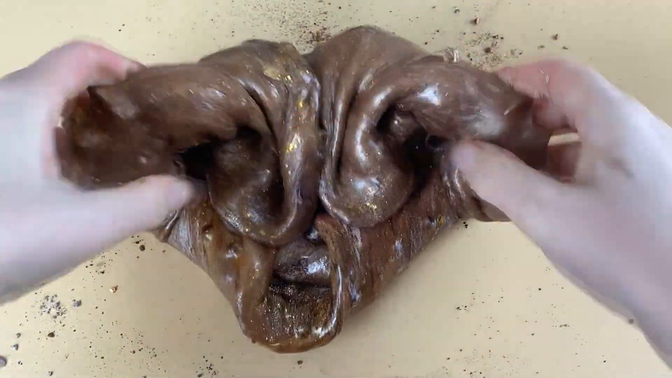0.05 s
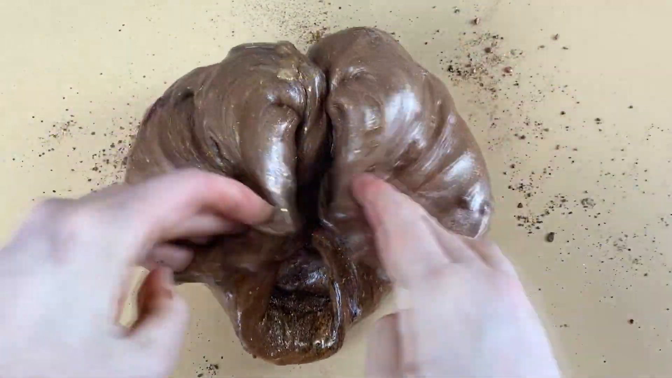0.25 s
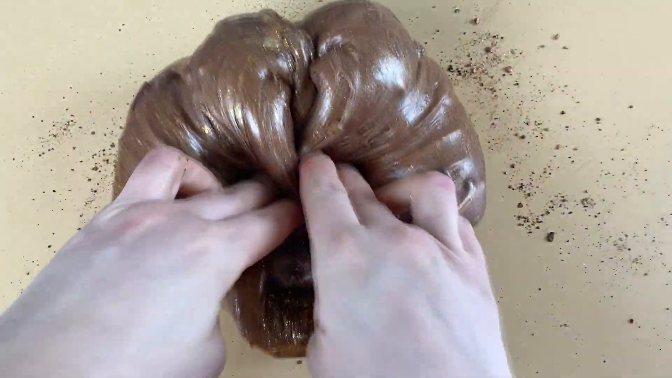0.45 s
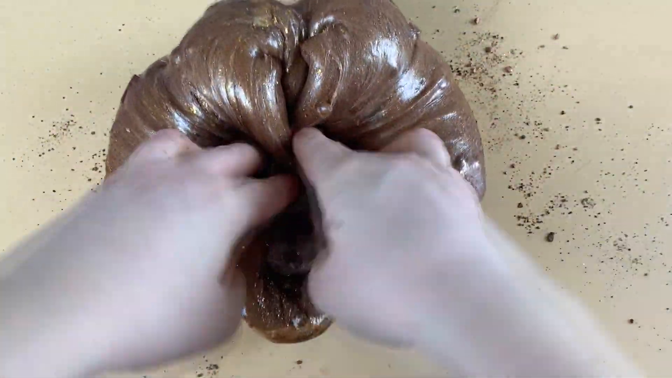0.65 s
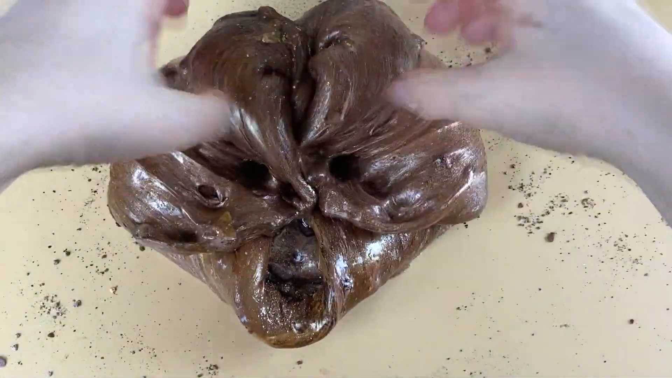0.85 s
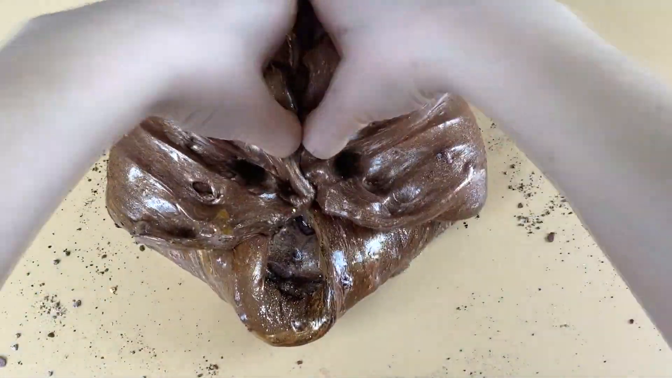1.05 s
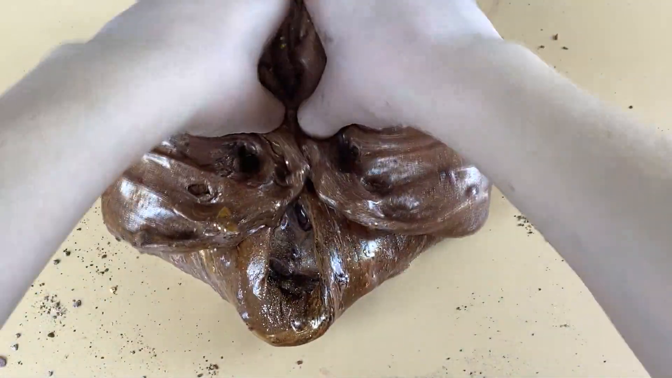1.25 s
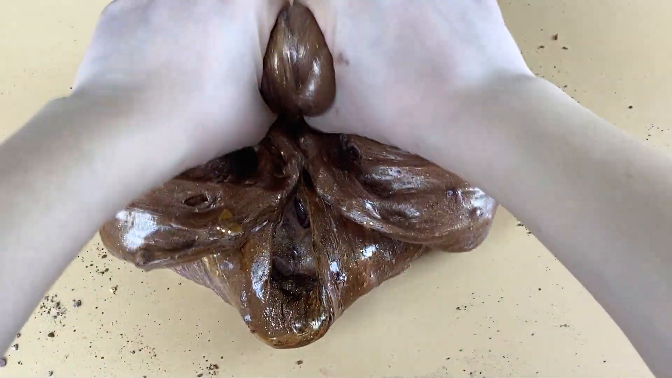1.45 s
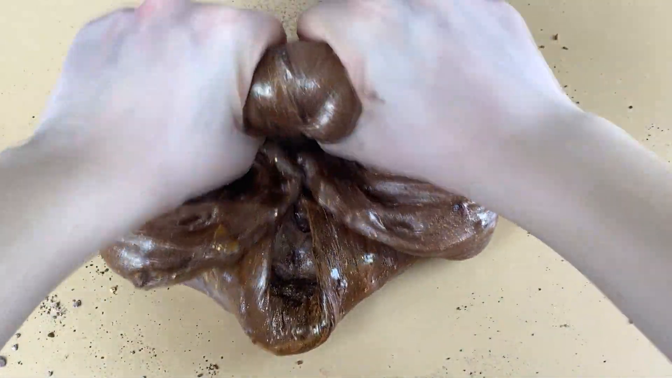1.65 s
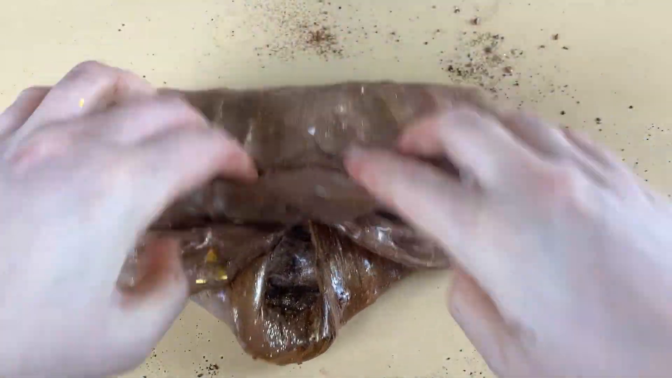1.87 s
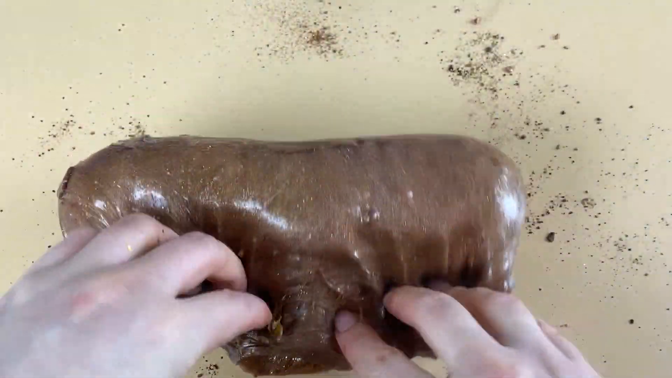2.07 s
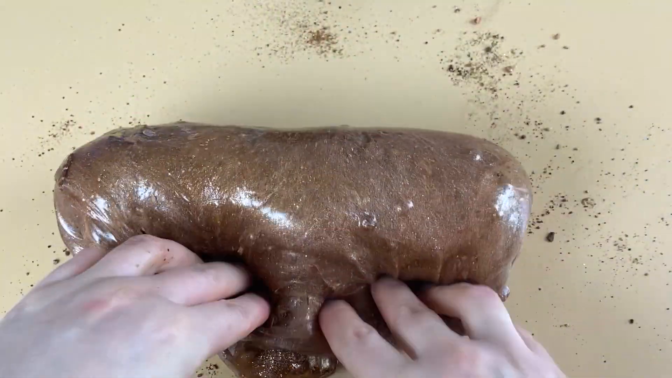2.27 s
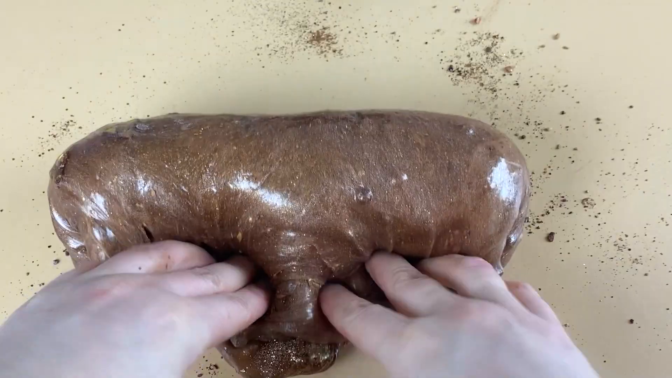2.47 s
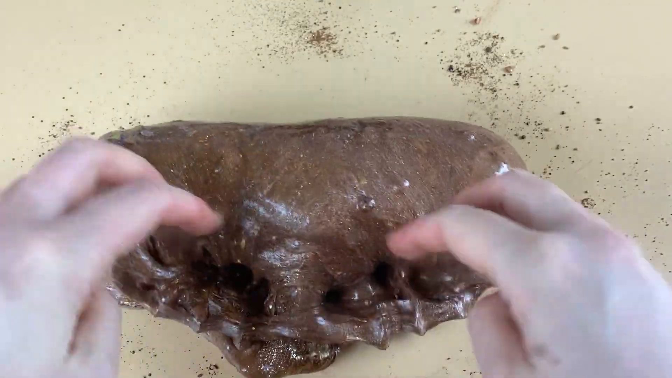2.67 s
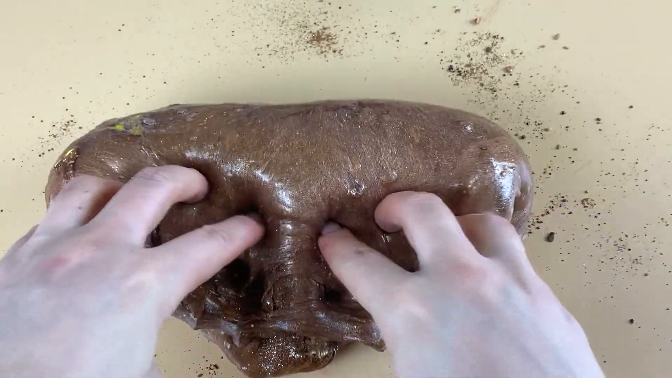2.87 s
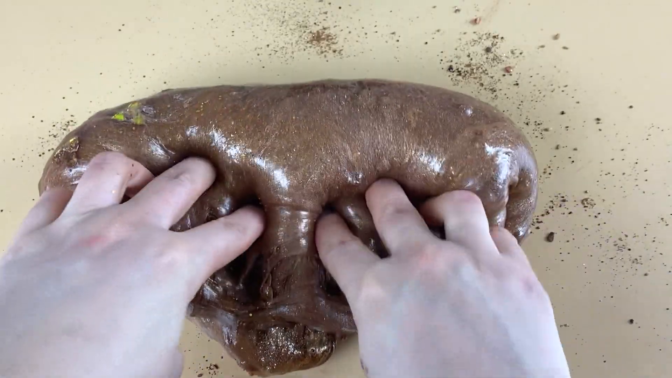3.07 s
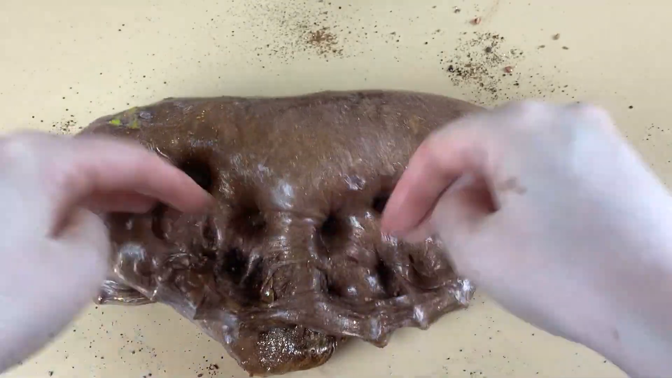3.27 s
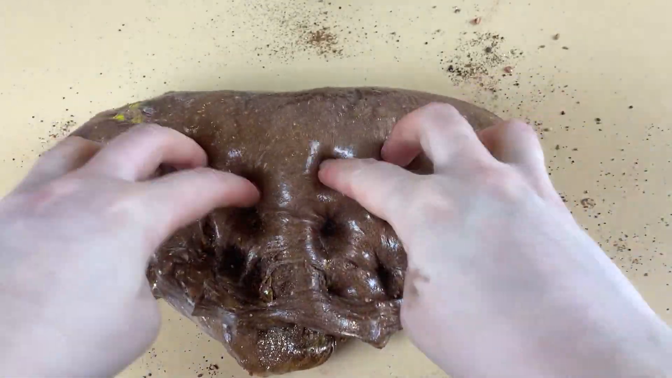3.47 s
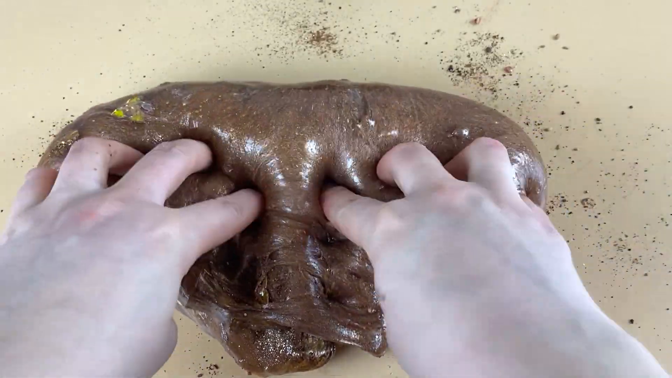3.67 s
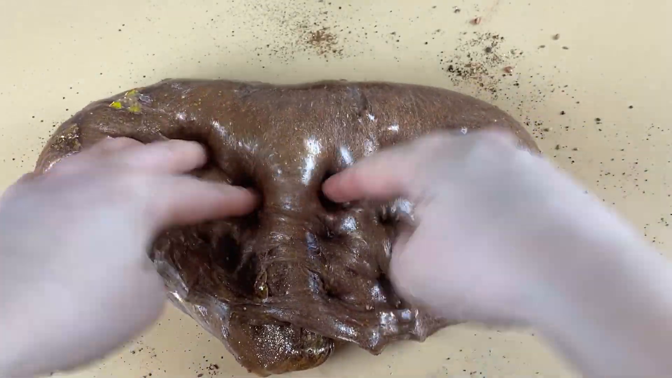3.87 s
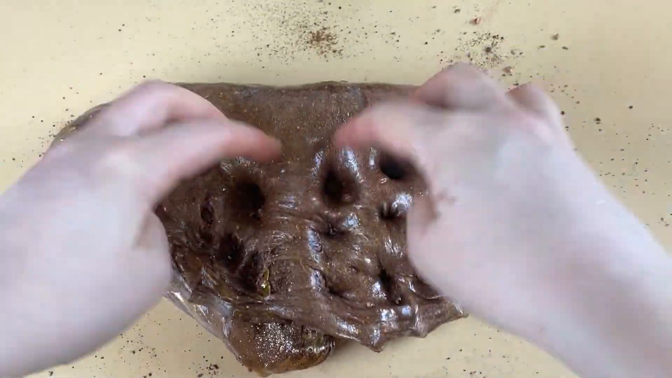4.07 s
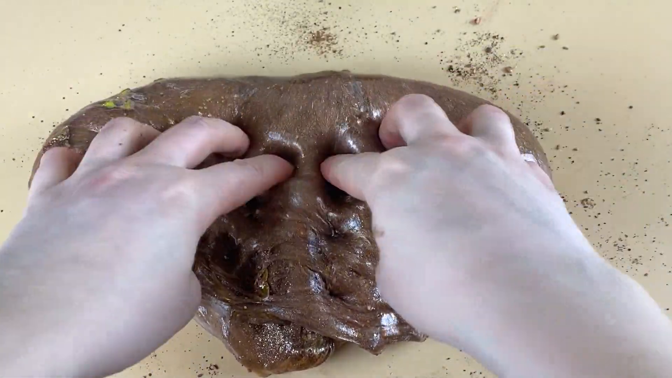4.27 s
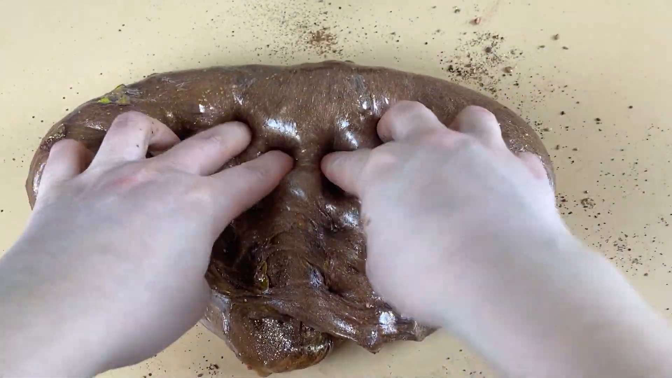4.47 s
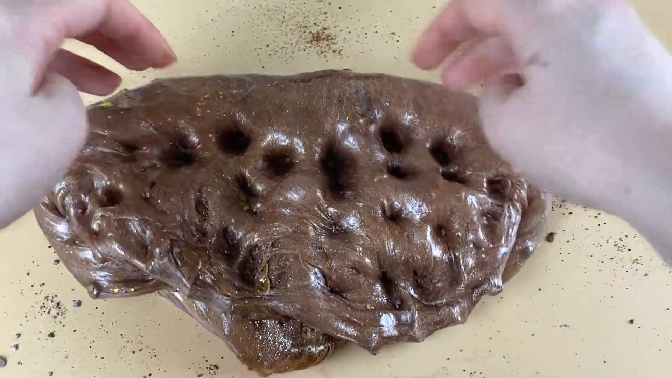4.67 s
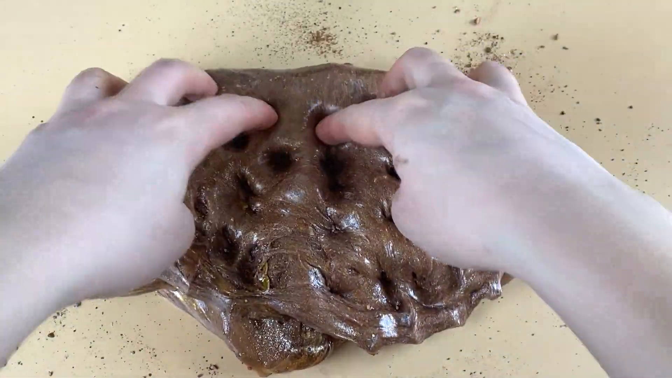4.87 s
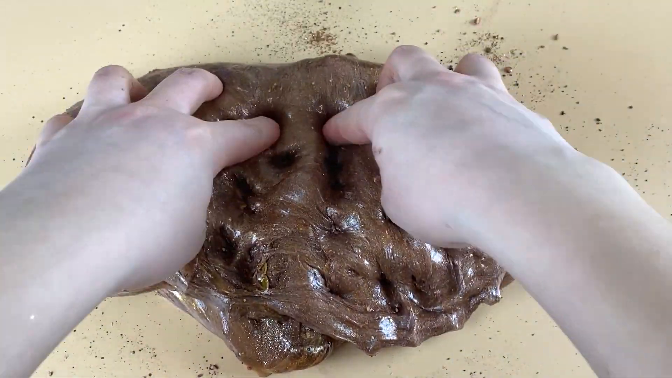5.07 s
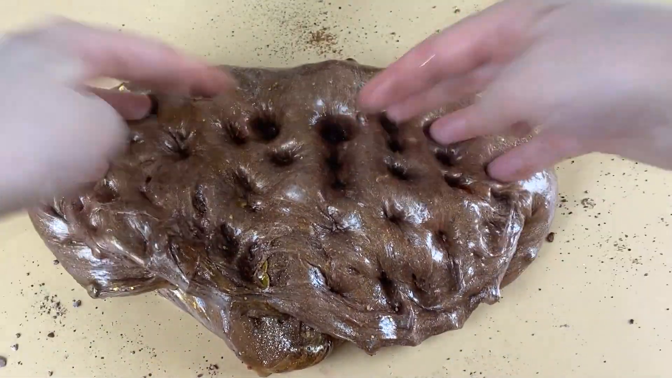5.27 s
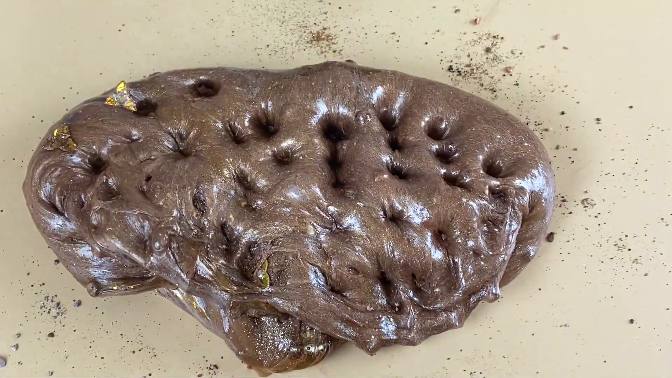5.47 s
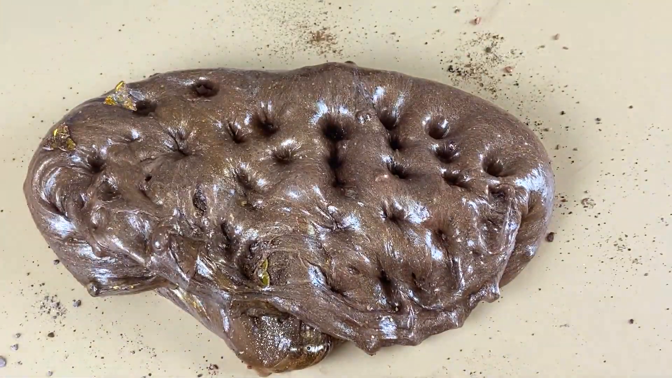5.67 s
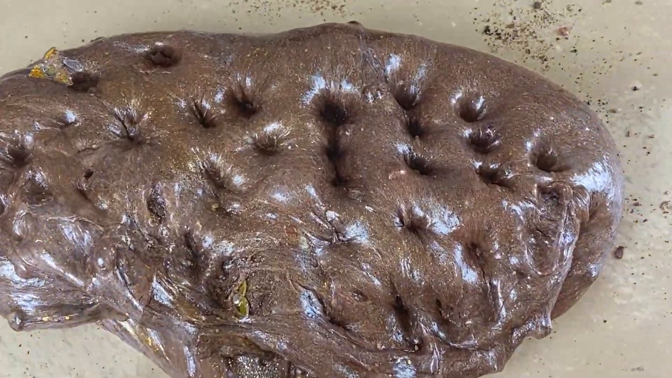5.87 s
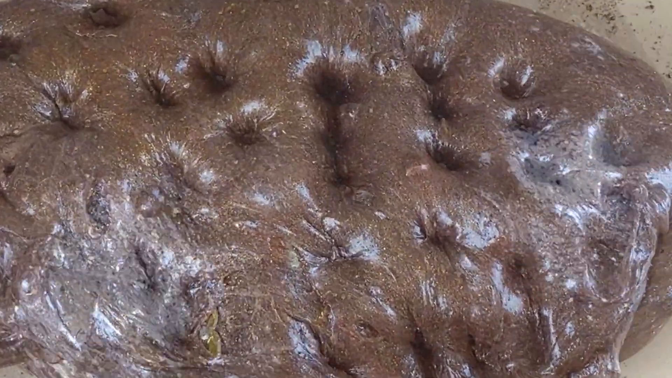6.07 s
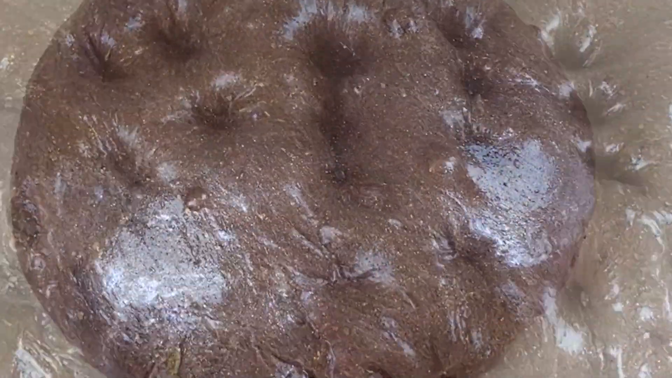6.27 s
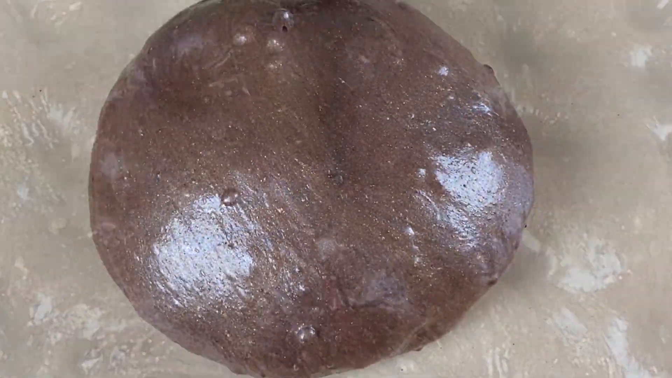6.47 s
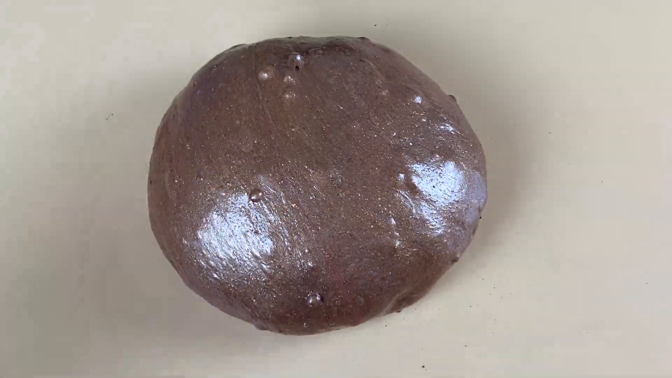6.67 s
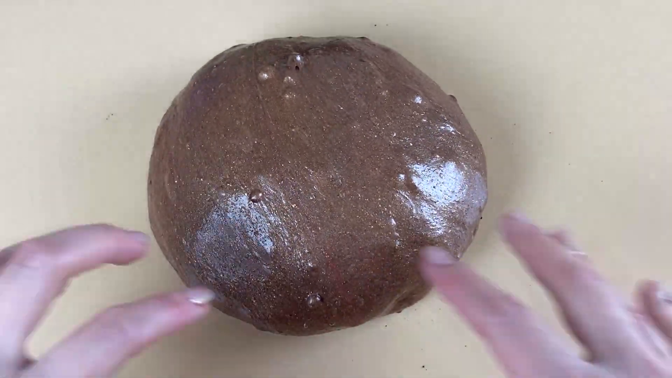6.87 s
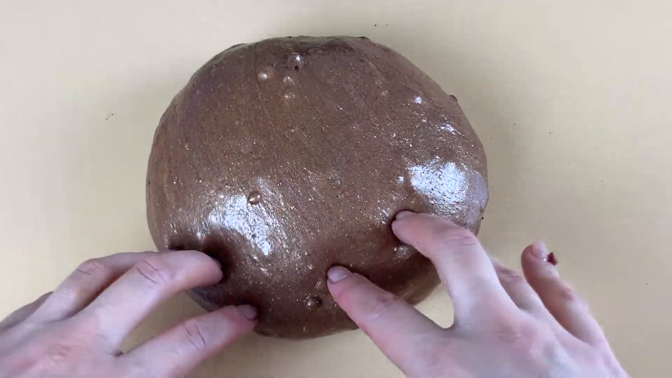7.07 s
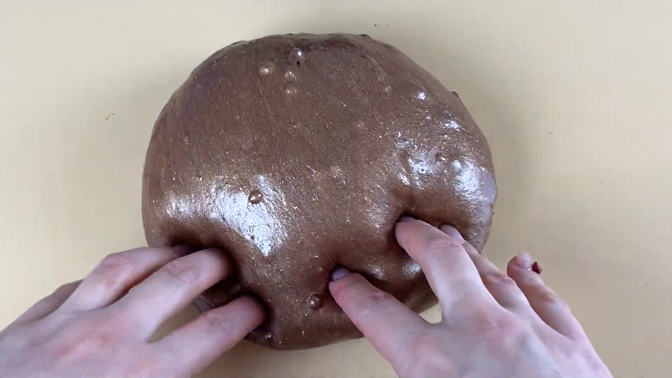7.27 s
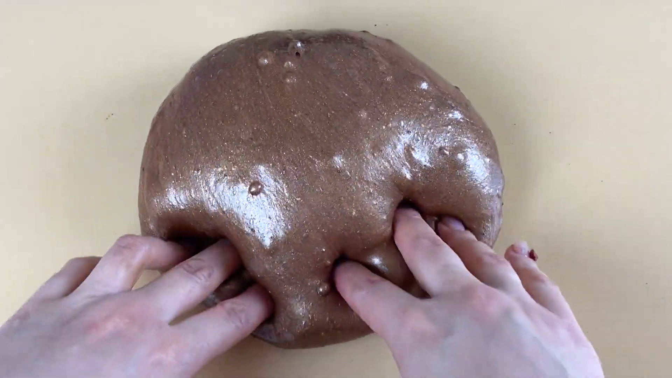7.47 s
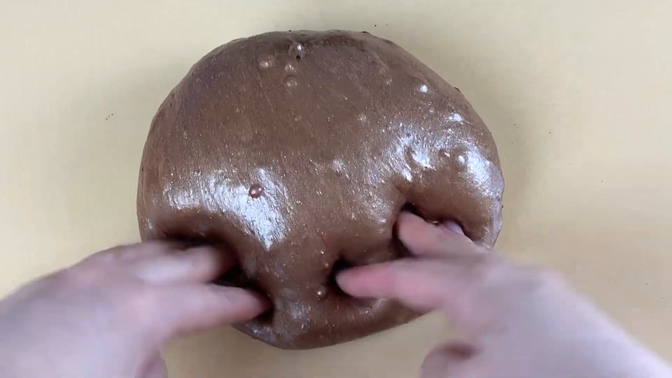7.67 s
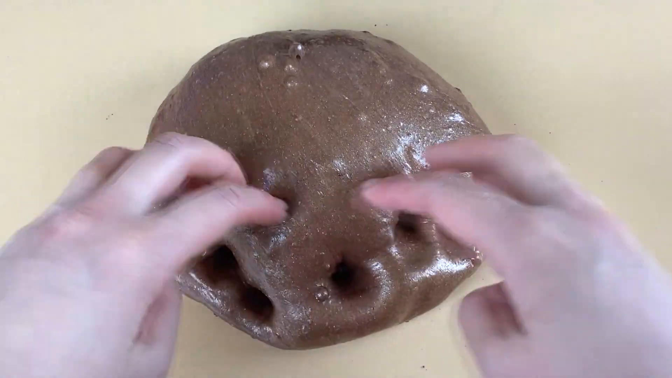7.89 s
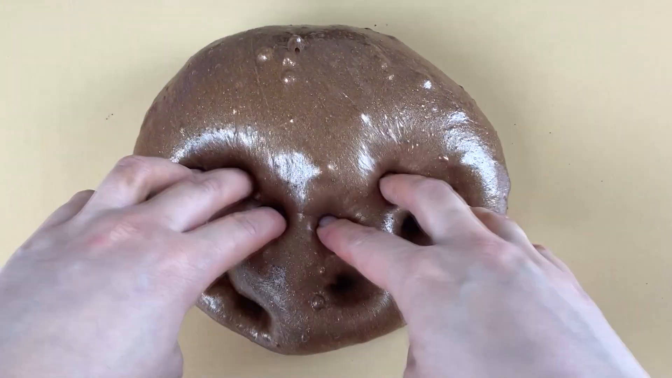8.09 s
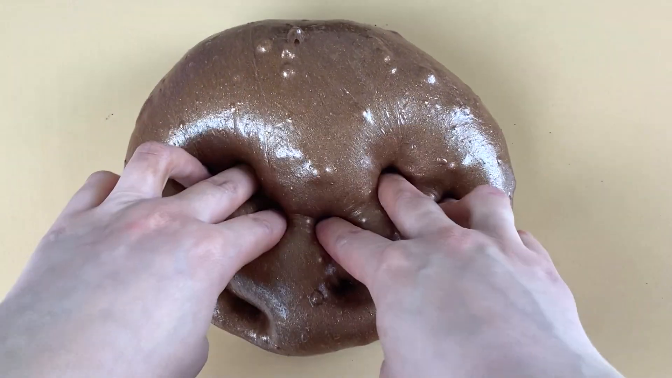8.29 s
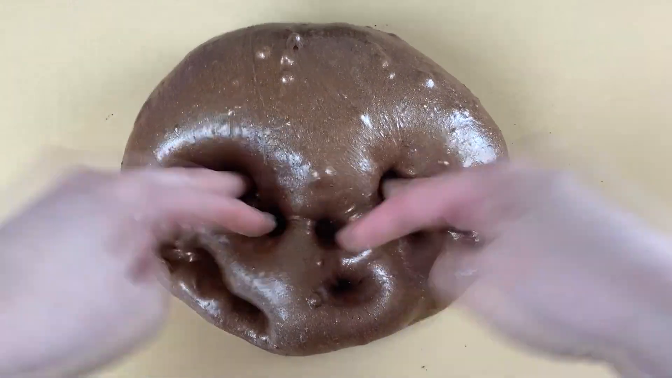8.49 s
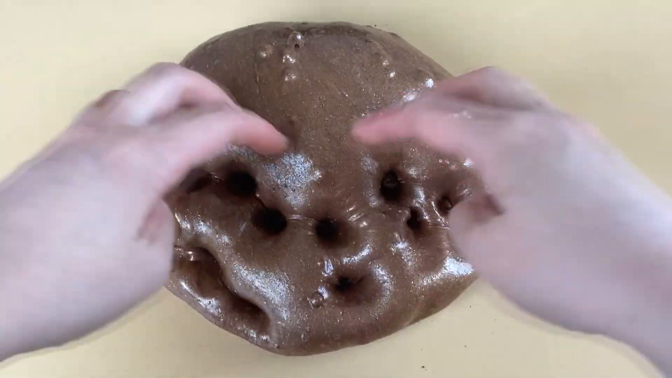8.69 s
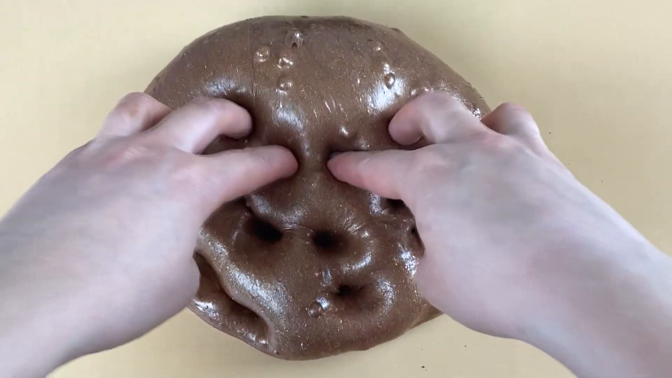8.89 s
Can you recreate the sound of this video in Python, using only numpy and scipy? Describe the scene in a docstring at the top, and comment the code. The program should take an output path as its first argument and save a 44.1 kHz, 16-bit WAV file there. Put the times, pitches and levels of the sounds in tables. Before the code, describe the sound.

Two hands work a sticky, glossy slime at a table, heard very close. It begins with squelching and crackling, thickens into a sharp, loud run of snapping air pockets with dull low thuds, then thins to rhythmic presses and sucking finger releases with hollow pops. After a near-silent gap with only room hush, a few last pokes and pops.

```python
"""Wet slime folded, squeezed and poked by two hands at a table, close to a stereo microphone in a small room.
First fingers tear loose with a wet rush and a squirt of air, and sticky skin crackles through a fold.
A second fold is squeezed from about 1 s to 2 s: air pockets snap brightly, bubbles ring and air hisses out.
Then pokes: fingers pull out in a burst of ruptures, their holes pop open; near 5.4 s a faint airy swish.
After a quiet spell, fingers sink in again from 7.2 s, with two last groups of pulls and pops."""
import sys
import numpy as np
from scipy import signal
from scipy.fft import rfft, irfft
from scipy.io import wavfile
from scipy.ndimage import uniform_filter1d

SR = 44100
rng = np.random.default_rng(int(sys.argv[2]) if len(sys.argv) > 2 else 0)


def wrap_up_sound(samples):
    """Save the sound to the file named by the first command line argument, as 16-bit audio."""
    columns = np.atleast_2d(samples).T
    # keep every value between -1 and 1, then stretch to whole-number steps
    tamed = np.clip(columns, -1, 1)
    steps = np.round(tamed * 32767).astype(np.int16)
    wavfile.write(sys.argv[1], SR, steps)


N = 393813
TIME = np.arange(N) / SR  # s

# room tone: hz, level_db (per Hz, relative)
HUSH = [(18, -40), (30, -5), (249, -2), (299, 1), (455, -6), (1140, -12), (1290, -7), (1510, -14),
        (2070, -13.5), (3490, -18.5), (8500, -18.5), (12300, -18.5), (15500, -16.5)]
HUSH_DB = -66  # gain on the room tone
# how long each band rings in the room: hz, t60_s
ROOM_T60 = [(60, 0.85), (130, 0.14), (350, 0.26), (900, 0.32), (2400, 0.29), (6400, 0.19), (15000, 0.12)]
# dull low thuds as palms meet and fingers lean in: start_s, thud_db (relative)
JOLTS = [(.005, -39), (.5, -44), (1.05, -28), (1.281, -32), (1.391, -36), (1.741, -38), (3.019, -46),
         (7.241, -49)]
# colour of the low thud: hz, level_db (per Hz, relative)
THUD = [(15, -7), (40, -3), (90, -0.5), (160, -4), (300, -27.5), (900, -71.5)]
# a faint airy swish as the hands draw away: start_s, length_s, level_db
SWISH = (5.41, 0.41, -60)
# air squirting through a slit: start_s, level_db, pitch_hz, t60_s
SQUIRTS = [(.001, -14, 750, .14), (.002, -17, 2920, .15), (0.447, -37, 2520, .12), (.706, -24, 1740, .3),
           (0.889, -42, 2500, .39), (0.996, -33, 1600, .27), (1.399, -12.5, 6326, .25),
           (1.604, -20.5, 8800, .22), (1.768, -9.5, 890, .09), (1.772, -21.5, 1883, 0.18),
           (2.377, -38.5, 4450, .25), (2.874, -28.5, 11000, .18), (3.875, -42.5, 1860, .3),
           (3.975, -28.5, 951, .12), (4.491, -48, 3180, .4), (7.692, -10.5, 1570, .05),
           (8.263, -45, 1500, .15), (8.51, -27, 1020, .2)]
# small bubbles and fingertips landing: start_s, peak_db (relative), starting pitch_hz
BUBBLES = [(0.1967, -22, 1820), (0.4166, -29, 570), (0.4461, -18.5, 2480), (0.479, -22.5, 680),
           (0.9588, -30.5, 1280), (1.166, -13.5, 2650), (1.2204, -5, 1288), (1.2704, -10, 2120),
           (1.2857, -13, 1120), (1.321, -16, 1499), (1.3464, -15, 1170), (1.3539, -6.5, 1319),
           (1.4005, -2.5, 2181), (1.6019, -6.5, 910), (1.769, -7.5, 1150), (2.1138, -22, 2420),
           (2.288, -25, 1620), (2.3768, -26.5, 470), (2.853, -22.5, 1810), (2.873, -19, 1790),
           (2.9964, -22, 500), (3.0612, -35, 2055), (3.7417, -22.5, 932), (4.359, -28, 1790),
           (4.4512, -15, 1100), (4.7626, -31, 769), (4.9083, -34, 856), (4.981, -37.5, 2110),
           (5.089, -36, 1175), (7.0733, -32, 1900), (7.2106, -39, 1490), (7.3154, -41, 2760),
           (7.4649, -46, 583), (7.578, -34, 844), (7.691, -8, 2070), (8.0135, -32, 1166),
           (8.242, -31.5, 850), (8.2643, -22, 444), (8.818, -38.5, 1350), (8.8703, -25, 393),
           (8.899, -18.5, 580)]
# colours of the three slime noises: hz, level_db (per Hz, relative)
SUCTION = [(30, -24), (100, -20), (170, -3), (260, -1), (480, -4), (700, -9.5), (1100, -14.5),
           (2200, -41.5)]
WET = [(300, -25), (650, 0), (950, -1), (1400, -2.5), (2100, -3.5), (3200, -6.5), (5000, -15.5),
       (9000, -37)]
FIZZ = [(1500, -22), (3000, -0.5), (4500, 0), (7000, -3), (10000, -0.5), (13000, -5), (16000, -14)]
# skin peeling while laying down the first fold, then squeezing the next; per fold: time_s, grip_db
FOLDS = [
    [(0, -40), (.06, -42.5), (.17, -38), (.23, -48.5), (.34, -54), (.37, -47.5), (.67, -57)],
    [(1.04, -48), (1.2, -34.5), (1.45, -40), (1.58, -42), (1.77, -30.5), (1.9, -43), (2.0, -41),
     (2.11, -43), (2.2, -58)],
]
# fingertips sinking in: start_s, length_s, grip_db
PRESSES = [(0.774, 0.36, -56.5), (2.201, 0.29, -47.5), (2.349, 0.098, -46.5), (2.83, 0.31, -53),
           (3.446, 0.44, -65.5), (4.181, 0.31, -61.5), (4.797, 0.28, -67.5), (7.22, .25, -65),
           (7.909, 0.15, -67), (8.227, 0.15, -70.5)]
FIRM_DB = -39.5  # the grip_db that counts as a firm grip
# thin skins over air pockets snapping: start_s, peak_db (relative), ring pitch_hz
SNAPS = [(0.3543, -25.5, 9700), (0.4966, -17.5, 5050), (0.5619, -16, 6300), (1.004, -24, 14000),
         (1.047, -5.5, 4260), (1.1573, -14, 3480), (1.1675, -10, 4650), (1.181, -9.5, 9700),
         (1.222, -8.5, 3060), (1.2509, -4, 10700), (1.2716, -2.5, 5560), (1.32, -5.5, 6900),
         (1.3478, -4.5, 12630), (1.366, -11, 13300), (1.387, -14.5, 5600), (1.4, 3.5, 6536),
         (1.466, -5.5, 8500), (1.505, -8, 10700), (1.5118, -0.5, 9200), (1.5193, -17, 5770),
         (1.566, -4, 10100), (1.601, 5, 10000), (1.7, -11.5, 9100), (1.9667, -14, 10800),
         (1.9871, -10.5, 4100), (2.0002, -10.5, 9800), (2.1033, -13, 10100), (2.125, -16.5, 3680),
         (2.8739, -10, 10400), (3.02, -39.5, 6000), (3.087, -32.5, 10080), (3.7412, -30, 5020),
         (4.4516, -26, 3200), (4.607, -14, 7940), (5.2642, -4.5, 4490), (8.8984, -10, 8900)]
# finger holes popping open: start_s, peak_db, settled cavity pitch_hz
POPS = [(0.743, -12, 234.6), (0.756, -13, 523), (1.046, -12, 560), (2.546, -8.5, 420), (2.595, -5.5, 253),
        (3.238, -13.5, 290.4), (3.275, -6.5, 510), (3.281, -9.5, 456), (3.91, -10.5, 286),
        (3.941, -11, 272.4), (3.975, -18, 868), (4.57, -17.5, 470), (4.587, -14, 446), (4.604, -8, 387),
        (4.632, -17, 459), (5.264, -4, 444), (7.69, -15, 430), (7.731, -5, 224), (7.746, -15.5, 174),
        (8.491, -4.5, 387), (8.502, -5, 266), (8.516, -7, 343), (8.521, -17, 174), (8.92, -21, 411)]
# fingers tearing loose, mostly one hand just after the other: release_s, suction_db, wetness_db, rise_s
PULLS = [(.003, -24.5, 12, 0.0047), (0.501, -27.5, 0.5, 0.052), (0.752, -17.5, -1.5, .05),
         (1.049, -18, -5, 0.0026), (2.55, -19, -1, 0.027), (2.59, -18.5, 1.5, .005),
         (3.242, -20.5, -4, .034), (3.273, -12.5, -2.5, .0075), (3.913, -24, 1.5, 0.026),
         (3.943, -13.5, -3, 0.0092), (3.978, -26, -3, .02), (4.573, -22.5, 3.5, 0.0181),
         (4.605, -13, 1, .008), (5.264, -18.5, 3.5, 0.031), (5.294, -18.5, 0, 0.034),
         (7.691, -17, 5, 0.0058), (7.727, -19.5, 7.5, .041), (8.494, -18.5, -2, 0.029),
         (8.518, -15.5, -4.5, .021)]
# how long each layer of a pull dies away: t60_s of suction, wet crackle, fizz
PULL_T60 = (0.2, 0.17, 0.2)


def amp(db):
    """Decibels to a linear gain."""
    return 10 ** (np.asarray(db) / 20)


def evened(x):
    """Scales x to rms 1."""
    return x / np.sqrt(np.mean(x ** 2) + 1e-20)


def fade(t, t60):
    """Falls 60 dB in t60 seconds."""
    return np.exp(-np.log(1000) * t / t60)


def arch(start_s, length_s):
    """Swells from nothing to 1 and back."""
    return np.sin(np.pi * np.clip((TIME - start_s) / length_s, 0, 1))


def wander(per_s):
    """A random curve of rms 1, with per_s random points a second joined by straight lines."""
    return evened(np.interp(TIME * per_s, np.arange(4096), rng.standard_normal(4096)))


def read(points, hz):
    """Reads a table of (Hz, value) on a log-frequency axis."""
    table_hz, value = np.transpose(points)
    return np.interp(np.log(hz + 1), np.log(table_hz), value)


def coloured(x, spectrum):
    """Filters x by the spectrum and brings it to rms 1."""
    gain = amp(read(spectrum, np.fft.rfftfreq(N, 1 / SR)))
    return evened(irfft(rfft(x) * gain, N))


def resonate(x, hz, width_hz):
    """One two-pole resonance."""
    b, a = signal.iirpeak(hz, hz / width_hz, SR)
    return signal.lfilter(b, a, x)


def add(mix, start_s, sound, pan_db=0):
    """Lays a sound into the stereo mix; a positive pan_db leans left."""
    part = mix[:, max(round(start_s * SR), 0):][:, :sound.shape[-1]]
    part += amp([[pan_db / 2], [-pan_db / 2]]) * sound[..., :part.shape[1]]


def crackle(spectrum, per_s, spread_db, scatter, clump_db=1):
    """Countless tiny ruptures of uneven size that come in clumps, each somewhere between left and right."""
    size = amp(spread_db * np.minimum(rng.exponential(1, N), 4)) * rng.choice([-1, 1], N)
    clicks = size * amp(clump_db * wander(per_s=70)) * (rng.random(N) < per_s / SR)
    side = scatter * rng.standard_normal(N)
    return coloured(np.array([clicks * (1 + side), clicks * (1 - side)]), spectrum)


def froth(per_s, spread_db, cycles, clump_db, scatter=0.46):
    """Wet crackle: micro-bubbles open in clumps, each ringing for a few cycles at a pitch of its own."""
    at = np.flatnonzero(rng.random(N) < per_s / SR)
    pitch, size, side, sign = rng.random((len(at), 4)).T
    hz = 450 * 14 ** pitch  # 450 to 6300 Hz
    turns = np.outer(hz, np.arange(256) / SR).astype(np.float32)
    size_db = -spread_db * np.log(size + .02) + clump_db * wander(per_s=70)[at]
    size = amp(size_db) * np.sign(sign - .5)
    rings = np.sin(2 * np.pi * turns) * np.exp(-turns / cycles) * (size * hz)[:, None]
    where = (at[:, None] + np.arange(turns.shape[1])).ravel()
    lean = scatter * (2 * side - 1)[:, None]
    left, right = [np.bincount(where, (rings * (1 + k * lean)).ravel(), N)[:N] for k in (1, -1)]
    return coloured(np.array([left, right]), WET)


def room_tone():
    """Steady hush of the room: noise partly shared by both sides of the microphone."""
    noise = rng.standard_normal(N) + 1.5 * rng.standard_normal((2, N))
    return amp(HUSH_DB) * coloured(noise, HUSH)


def room(x, delay_s=0.0068, late_db=-29, late_t60=1.8):
    """Sparse reflections, different at each port: each band dies at its own speed, over a faint long tail."""
    taps = rng.choice([-1., 1.], (2, SR)) * (rng.random((2, SR)) < 3000 / SR)
    taps = taps * (np.arange(SR) > delay_s * SR)
    hz, t, bands = signal.stft(taps, SR, nperseg=256)
    decay = fade(t, read(ROOM_T60, hz)[:, None]) + amp(late_db) * fade(t, late_t60)
    tail = signal.istft(bands * decay, SR, nperseg=256)[1]
    return signal.fftconvolve(x, tail / np.linalg.norm(tail[0]), axes=1)[:, :N]


def ports(x, lag_s=.00003, balance_db=-1.7):
    """Sound reaches the left port of the microphone a little sooner and the right one a little louder."""
    late = np.exp(-2j * np.pi * np.fft.rfftfreq(N, 1 / SR) * lag_s)
    right = irfft(rfft(x[1]) * late, N)
    return np.array([amp(balance_db / 2) * x[0], amp(-balance_db / 2) * right])


def boom(x, pressing, lean_db=-53, lean_slope=0.54, jolt_t60=0.54, hz=59, waver_db=4.5, drift=1.6,
         t60=1.7, ring_db=-29, thud_db=-20, thud_t60=0.37):
    """Tugs give a dull thud and a low, wavering, lingering note; leans and jolts only thud."""
    t = np.arange(SR * 2) / SR
    force = abs(uniform_filter1d(resonate(x.mean(0), hz=303.3, width_hz=270) ** 2, size=1500))

    def held(t60):
        """The force of each tug, lingering for t60 seconds."""
        return np.sqrt(abs(signal.fftconvolve(force, fade(t, t60) ** 2)[:N]) / 1500)

    jolts = sum(amp(db) * (TIME > s) * fade(abs(TIME - s), jolt_t60) for s, db in JOLTS)
    weight = amp(lean_db) * pressing ** lean_slope + jolts
    thud = coloured(rng.standard_normal((2, N)) + 0.29 * rng.standard_normal(N), THUD)
    phase = 2 * np.pi * hz * TIME + drift * wander(per_s=3.1)  # drift in radians
    note = amp(waver_db * wander(per_s=9.6)) * np.sin(phase)
    thud_level = amp(thud_db) * held(thud_t60) + uniform_filter1d(weight, size=300)
    return amp(ring_db) * held(t60) * note + thud_level * thud


def swish(hz=2400, width_hz=4000):
    """A faint airy swish as the hands draw away: one arch of broadly resonant noise."""
    start_s, length_s, db = SWISH
    air = evened(resonate(rng.standard_normal((2, N)), hz, width_hz))
    return amp(db) * arch(start_s, length_s) * air


def squirts(rise_s=0.00067, flutter=0.054, apart=0.46, slit_width=0.48):
    """Trapped air hisses through a soft slit with a fuzzy pitch and a fluttering level."""
    out, t = np.zeros((2, N)), np.arange(SR // 2) / SR
    for s, db, hz, t60 in SQUIRTS:
        width_hz = slit_width * hz
        air = rng.standard_normal(len(t)) + apart * rng.standard_normal((2, len(t)))
        hiss = evened(resonate(resonate(air, hz, width_hz), hz, width_hz))
        lips = np.exp(flutter * evened(uniform_filter1d(rng.standard_normal(len(t)), size=120)))
        add(out, s, amp(db) * hiss * lips * fade(t, t60) * (1 - np.exp(-t / rise_s)))
    return out


def bubbles(cycles=12, lower_db=-10, upper_db=-11, smack_db=-7, smack_t60=0.01, hiss_db=-22, hiss_t60=.13,
            glide_per_s=10, soft_hz=3800, level_db=1.5):
    """A small cavity rings briefly, rising in pitch, with a wet smack and hiss; the slime muffles all of it."""
    out, t = np.zeros((2, N)), np.arange(SR // 15) / SR
    muffle = signal.butter(4, soft_hz, fs=SR, output="sos")
    for s, db, hz in BUBBLES:
        phase = 2 * np.pi * hz * np.cumsum(1 + glide_per_s * t) / SR
        tones = np.sin(phase) + amp(lower_db) * np.sin(0.8 * phase) + amp(upper_db) * np.sin(1.6 * phase)
        ring = tones * fade(t, cycles / hz)  # down 60 dB after that many cycles of the starting pitch
        smack = evened(resonate(rng.standard_normal(len(t)), hz=1400, width_hz=780))
        smack = smack * (fade(t, smack_t60) + amp(hiss_db) * fade(t, hiss_t60))
        blip = signal.sosfilt(muffle, ring + amp(smack_db) * smack)
        add(out, s, amp(db + level_db) * blip / abs(blip).max())
    return out


def grip():
    """How hard the hands work the slime, 1 for a firm grip: while folding, and in one arch for each press."""
    folds = sum(np.interp(TIME, s, amp(db), left=0, right=0) for s, db in map(np.transpose, FOLDS))
    presses = sum(amp(db) * arch(s, length_s) for s, length_s, db in PRESSES)
    return abs(uniform_filter1d([folds, presses], size=700, axis=1)) / amp(FIRM_DB)


def ticks(effort, level_db=-47, slope=0.76):
    """A sparser wet crackle of small bubbles, fading less under a light touch."""
    return amp(level_db) * effort ** slope * froth(per_s=70, spread_db=2.5, cycles=2.1, clump_db=3.0)


def kneading(folding, pressing, body_db=-46, wet_db=-40, fizz_db=-37, press_fizz_db=-5,
             body_slope=.65, fizz_slope=1.2):
    """Skin keeps sticking and peeling while the hands press and fold; a firmer grip sounds brighter."""
    wet = folding + pressing
    body = wet ** body_slope  # slopes: dB of the layer per dB of grip
    fizz = (folding + amp(press_fizz_db) * pressing) ** fizz_slope
    return (amp(body_db) * body * crackle(SUCTION, per_s=1700, spread_db=5.0, scatter=0.31, clump_db=-0.5)
            + amp(wet_db) * wet * froth(per_s=1600, spread_db=3.5, cycles=1.4, clump_db=4.0)
            + amp(fizz_db) * fizz * crackle(FIZZ, per_s=6200, spread_db=4.5, scatter=0.97, clump_db=1.5))


def snaps(width_hz=2000, raw=0.092, lower_db=-7, apart=1.0, level_db=3, least_s=0.00075, extra_s=0.0018,
          centre_hz=5000, left_db_per_octave=3.5):
    """A skin rips in a few milliseconds and rings the tiny pocket beneath it."""
    out, t = np.zeros((2, N)), np.arange(SR // 40) / SR
    for s, db, hz in SNAPS:
        length_s = least_s + extra_s * amp(db)  # louder rips last longer
        pan_db = left_db_per_octave * np.log2(hz / centre_hz)  # brighter snaps sound further left
        grit = rng.choice([-1, 1], len(t)) + apart * rng.choice([-1, 1], (2, len(t)))
        rip = grit * np.exp(-(t / length_s) ** 2)
        pocket = resonate(rip, hz, width_hz) + amp(lower_db) * resonate(rip, hz * 0.58, width_hz)
        snap = pocket + raw * rip
        add(out, s, amp(db + level_db) * snap / abs(snap).max(), pan_db)
    return out


def pops(glide=0.095, settle_s=.006, rise_s=0.0013, cycles=14):
    """Air in a finger hole rings as the seal breaks; the pitch settles as the hole opens."""
    out, t = np.zeros((2, N)), np.arange(SR // 6) / SR
    for s, db, hz in POPS:
        turns = np.cumsum(hz * (1 + glide * np.exp(-t / settle_s))) / SR
        decay = fade(t, cycles / hz)  # 60 dB in so many settled cycles: big cavities ring longer
        ring = np.sin(2 * np.pi * turns) * decay * (1 - np.exp(-t / rise_s))
        add(out, s, amp(db) * ring / abs(ring).max())
    return out


def pulls(wet_db=-5, fizz_db=-7.5):
    """Slime stretches and lets go of the skin: ruptures swell to the release, then die away."""
    power = np.zeros((3, N))
    for s, db, wetness_db, rise_s in PULLS:
        near = slice(max(int((s - .5) * SR), 0), int((s + .5) * SR))
        t = TIME[near] - s
        decays = [fade(np.maximum(t, 0), t60) for t60 in PULL_T60]
        shape = np.exp(3.2 * np.minimum(t, 0) / rise_s) * decays
        layers = amp([[0], [wet_db + wetness_db], [fizz_db + wetness_db]])  # against the suction
        power[:, near] += (amp(db) * layers * shape) ** 2
    suction, wet, fizz = np.sqrt(power)
    return (suction * crackle(SUCTION, per_s=2500, spread_db=5.0, scatter=0.43, clump_db=1.5)
            + wet * froth(per_s=2000, spread_db=2.5, cycles=3.4, clump_db=1.5)
            + fizz * crackle(FIZZ, per_s=10000, spread_db=3.5, scatter=0.8, clump_db=3.5))


def scene():
    """The slime close to the microphone, the low boom of the handling and the room around it."""
    folding, pressing = grip()
    holes = pops() + pulls()
    clicks = snaps()
    blips = bubbles()
    air = squirts() + swish()
    skin = kneading(folding, pressing) + ticks(folding + pressing)
    # each source's send to the room
    echo = room(amp(-13.5) * holes + amp(-15.5) * clicks + amp(-11.5) * blips
                + amp(-21.5) * air + amp(-15.5) * skin)
    hush = room_tone()
    close = ports(holes + blips + air + skin) + ports(clicks, balance_db=-2.0)
    return close + echo + boom(holes + skin, pressing) + hush


def record(dry, edge_hz=16200):
    """The input clips at full scale, overloaded by the sharpest snaps; then a low-pass limits the band."""
    clipped = np.clip(dry, -1, 1)
    band_limit = signal.firwin(255, edge_hz, window=("kaiser", 8), fs=SR)
    return signal.oaconvolve(clipped, band_limit[None], "same")


dry = scene()
out = record(dry)
wrap_up_sound(out)
```